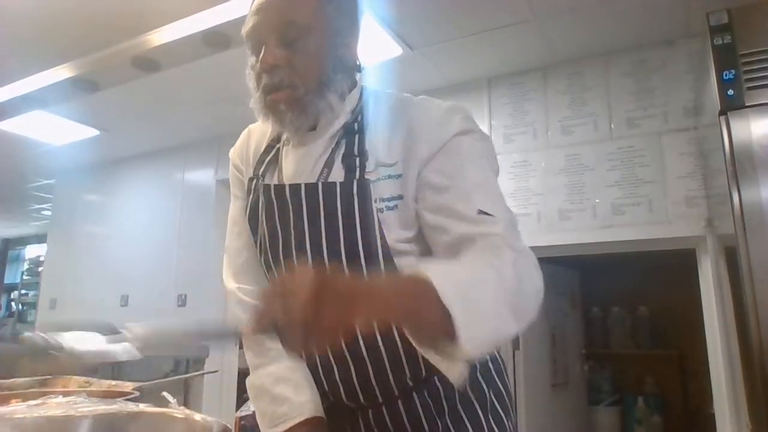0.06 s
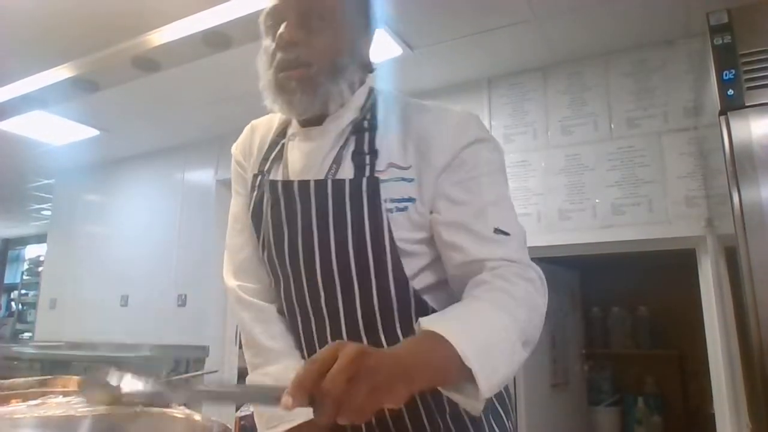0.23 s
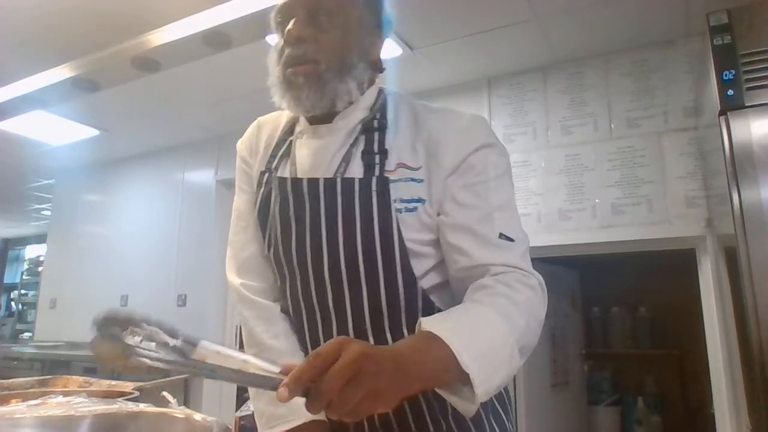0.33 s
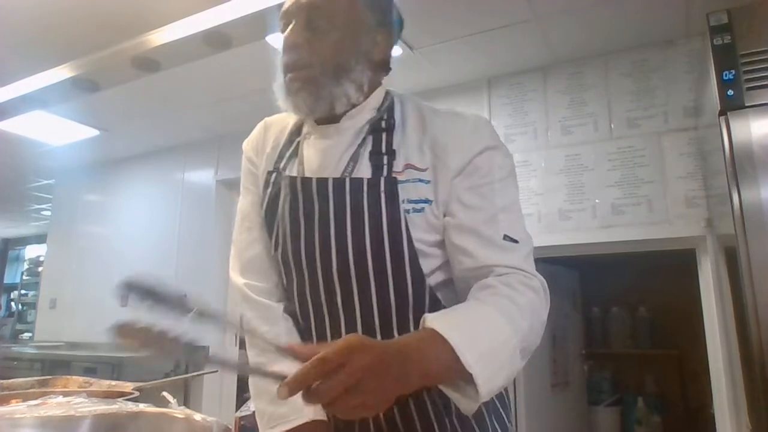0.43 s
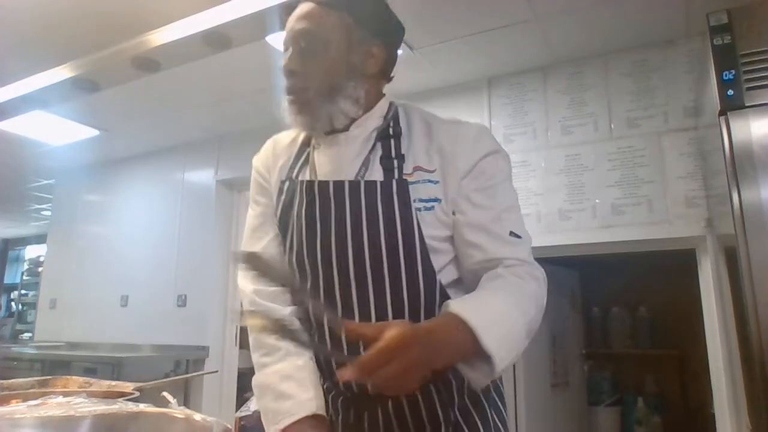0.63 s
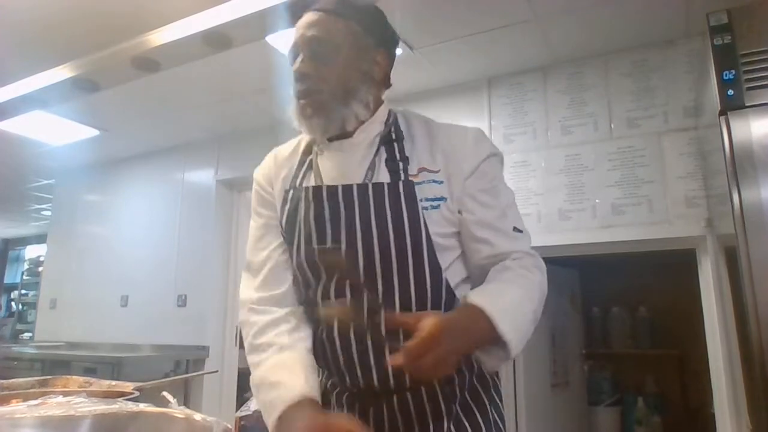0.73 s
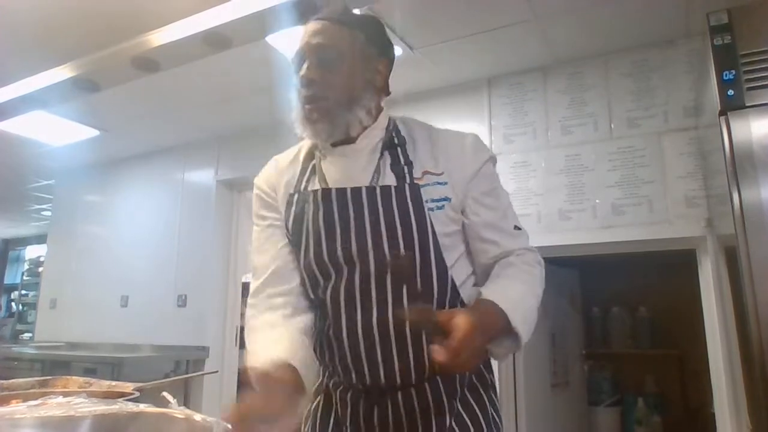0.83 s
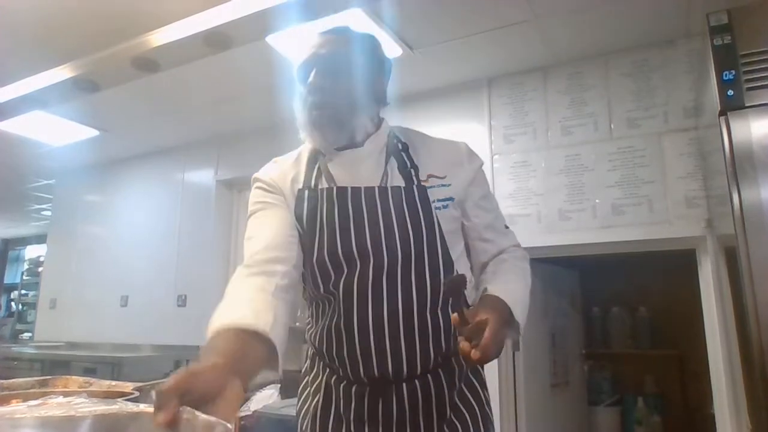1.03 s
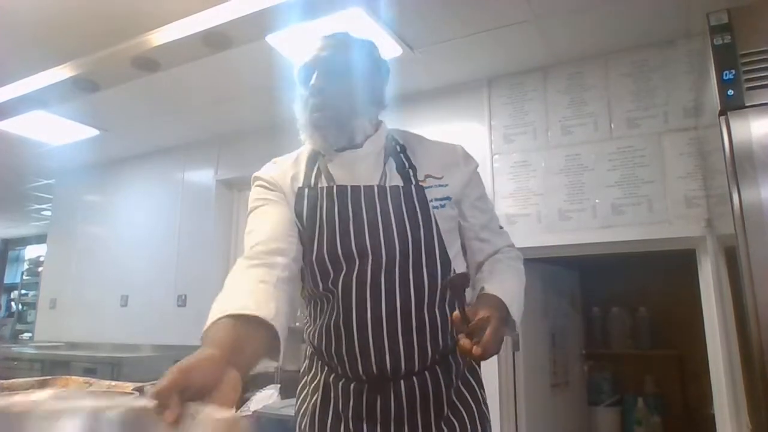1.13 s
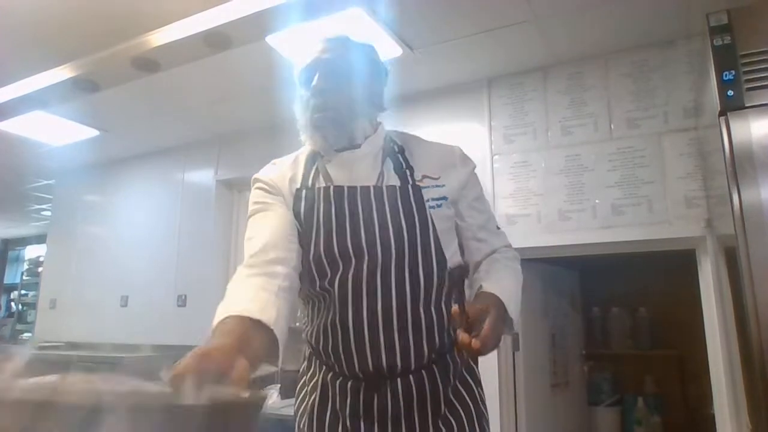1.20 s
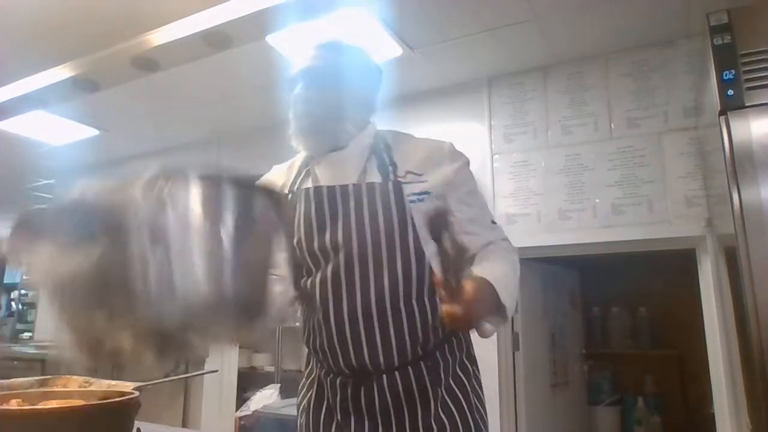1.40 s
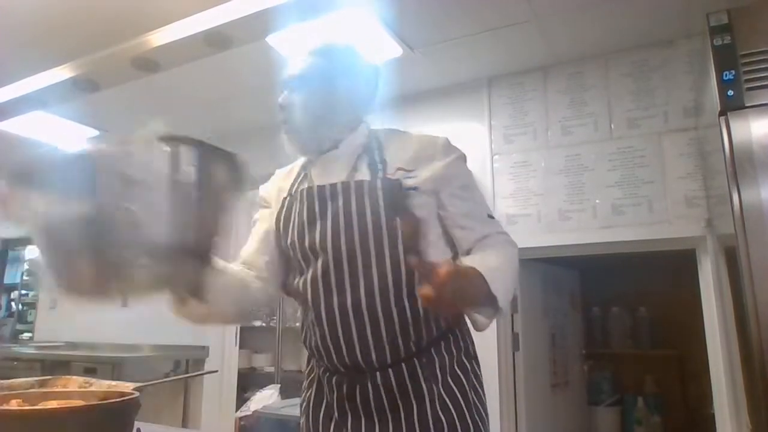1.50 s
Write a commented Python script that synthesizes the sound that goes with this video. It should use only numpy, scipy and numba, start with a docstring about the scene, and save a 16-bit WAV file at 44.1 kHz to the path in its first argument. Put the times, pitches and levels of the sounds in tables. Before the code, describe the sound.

Chicken sizzles and spits in hot oil throughout; a faint clink, then one loud ringing knock of steel tongs on the pan, then a few light clinks, over low extractor rumble in a tiled commercial kitchen, close microphone.

```python
"""In a kitchen, chicken sizzles in a pan of oil under the rumble of an extractor hood.
The oil is coloured noise, random crackle, ringing bubble pops and pitched spits of noise.
Steel tongs knock once on the pan's rim: fading sine waves ring over a noise thud.
A few light clinks, short bursts of coloured noise, come before and after the knock.
The hood is filtered noise; a limiter holds the knock down and lets go as it fades."""
import sys
import numpy as np
from scipy import signal
from scipy.fft import rfft, irfft
from scipy.io import wavfile
from numba import njit

SR = 44100
rng = np.random.default_rng(int(sys.argv[2]) if len(sys.argv) > 2 else 0)


def master(y):
    """Save y as 16-bit WAV."""
    cut = np.clip(np.atleast_2d(y).T, -1, 1)
    pcm = np.round(cut * 32767)  # scale
    wavfile.write(sys.argv[1], SR, pcm.astype(np.int16))


N = 68355  # length in samples, about 1.55 s
TOP_HZ = 15800  # upper edge of the sound


def undb(db):
    """Turn decibels into a gain."""
    return 10 ** (np.asarray(db) / 20)


def level(x, db):
    """Set the average (rms) strength of a sound in decibels."""
    return x * undb(db) / np.sqrt(np.mean(x ** 2))


def gain_at(hz, points):
    """Read a gain from a spectrum, joining its points along a log frequency scale."""
    f, db = np.array(points).T
    return undb(np.interp(np.log(np.maximum(hz, 1)), np.log(f), db))


def colour(x, points):
    """Shape a sound's spectrum, then set its rms to one."""
    hz = np.arange(N // 2 + 1) * SR / N
    shaped = irfft(rfft(x) * gain_at(hz, points), N)
    return level(shaped, 0)


def since(start):
    """Seconds since a moment, zero before it."""
    return np.maximum(np.arange(N) / SR - start, 0)


def fade(t, t60):
    """Die away exponentially from t = 0, falling 60 dB in t60 seconds."""
    return (t > 0) * np.exp(-np.log(1000) * t / t60)


def follow_level(points):
    """Gain over the whole scene from a table of times and levels."""
    return undb(np.interp(since(0), *np.array(points).T))


def bursts(rate, spread_db):
    """Single clicks at random moments: many small, a few large."""
    when, size, sign = rng.random((3, N))
    happens = when < rate / SR
    boost = np.minimum(-np.log(1 - size), 4)  # mostly small, never above 4
    return happens * np.sign(sign - .5) * undb(spread_db * boost)


ROOM_T60_S, ROOM_DB = 0.11, -2  # fading time; wash compared with the direct sound


def room(x):
    """Direct sound plus the short wash of tiled walls, made of fading noise."""
    tail = rng.standard_normal(N) * fade(since(0.009), ROOM_T60_S)
    tail = tail / np.linalg.norm(tail)
    return x + undb(ROOM_DB) * signal.fftconvolve(x, tail)[:N]


POP_PER_S, POP_SPREAD_DB = 150, 4
POP_HZ, POP_OCTAVES = 6980, 0.23  # middle pitch; one step of spread around it
POP_CYCLES = 2.5  # cycles for a ring to shrink to about a third


def pops(count=14):
    """Steam bubbles of many sizes burst in the oil, each ringing for a few cycles."""
    t = np.arange(SR // 50) / SR
    out = 0
    for step in np.linspace(-2, 2, count):
        hz = POP_HZ * 2 ** (step * POP_OCTAVES)
        ping = np.sin(2 * np.pi * hz * t) * np.exp(-hz * t / POP_CYCLES)
        moments = bursts(POP_PER_S / count, POP_SPREAD_DB)
        weight = np.exp(-step ** 2 / 6)  # middle pitches are strongest
        out = out + weight * signal.fftconvolve(moments, ping)[:N]
    return out


# colour of the frying oil: (frequency [Hz], relative level [dB per Hz])
OIL_COLOUR = [(1000, -4), (3300, -11.5), (4500, 0), (6000, -3), (7800, 0), (9500, -6.5), (12500, -10),
              (15500, -5.5)]
# swell and ebb of the sizzle: (time [s], level [dB])
SIZZLE_SWELL = [(0, 5.5), (.15, 1.5), (.42, 2), (.55, 2), (.7, 3), (.88, 0.5), (1.0, 1), (1.19, -0.5),
                (1.3, 1.5), (1.5, 2.5)]
HISS_DB, CRACKLE_DB, POP_DB = -46, -44.5, -48.5  # before the swell
CRACKLE_PER_S, CRACKLE_SPREAD_DB = 1500, 4


def sizzle():
    """Boiling oil: fine hiss, dense crackle and single pops swell and ebb together."""
    hiss = undb(HISS_DB) * colour(rng.standard_normal(N), OIL_COLOUR)
    crackle = colour(bursts(CRACKLE_PER_S, CRACKLE_SPREAD_DB), OIL_COLOUR)
    oil = hiss + level(room(crackle), CRACKLE_DB) + level(room(pops()), POP_DB)
    return oil * follow_level(SIZZLE_SWELL)


# loudest spits of oil: (time [s], pitch [Hz], level before fading [dB], time to fade by 60 dB [s])
OIL_SPITS = [(0.011, 5960, -27, 0.016), (0.0195, 4550, -33, 0.067), (0.382, 6070, -26, 0.021),
             (.392, 6400, -27.5, 0.02), (.427, 7300, -33.5, 0.036), (0.688, 6400, -31, 0.022),
             (.805, 6450, -37, 0.017), (.825, 7500, -30.5, 0.016), (.845, 15000, -38.5, 0.2),
             (0.869, 6430, -29.5, 0.018), (0.956, 5450, -36, 0.016), (1.066, 4260, -38, 0.096),
             (1.094, 9600, -36, 0.018), (1.392, 7140, -36.5, 0.035), (1.468, 6560, -30, 0.027)]
SPIT_WIDTH = 0.13  # width of the noise band as a share of the pitch


def spits():
    """Larger droplets flash to steam, each a brief pitched spatter of noise."""
    hz = np.arange(N // 2 + 1) * SR / N
    out = 0
    for start, pitch, db, t60 in OIL_SPITS:
        detune = (hz - pitch) / (SPIT_WIDTH * pitch / 2)
        band = 1 / (1 + detune ** 2) ** 0.64  # strongest at the pitch
        spatter = irfft(rfft(rng.standard_normal(N)) * band, N)
        out = out + level(spatter, db) * fade(since(start), t60)
    return out


# ringing notes of the knock, the pan's main modes plus, first, the hob's low ring under the thud: (frequency
# [Hz], relative level [dB], time to fade by 60 dB [s])
KNOCK_NOTES = [(135, -10, .42), (277.5, 1.5, .62), (289, 1.5, .48), (420, -8, .19), (541, -10, .18),
               (694, 1.5, .26), (735, 1.5, .3), (817, -6, .32), (852, -9, .3), (1045, -4, .22),
               (1087, 5.5, .23), (1233, 2, .26), (1313, 2, .25), (1491, -4, .39), (1684, -7, .26),
               (1787, -4, .22), (2191, -9, .24), (2412, -1, .25), (2509, -3, .27), (2672, 0, .2),
               (2977, -3, .18), (3149, -7, .24), (4285, -8, .18), (5039, -12, .18)]
KNOCK_S, RING_DB = .2401, -11  # moment of the knock; gain of all the notes
RING_BUILD_CYCLES = 3.1  # cycles for a note to build up to about two thirds


def knock_ring(t):
    """The pan's strong modes and the hob's low ring swing as sine waves that build up quickly, then fade."""
    ring = 0
    for hz, db, t60 in KNOCK_NOTES:
        build = 1 - np.exp(-hz * t / RING_BUILD_CYCLES)
        ring = ring + undb(db) * fade(t, t60) * build * np.sin(2 * np.pi * hz * t)
    return undb(RING_DB) * ring


# the pan's crowded minor notes: (frequency [Hz], relative level [dB per Hz])
SHIMMER_COLOUR = [(400, -9.5), (560, -11.5), (900, -18), (1100, -6.5), (2000, -14.5), (2600, -5.5),
                  (3150, -6.5), (3500, -13), (4300, -6), (5600, -10), (7400, -6.5), (9000, -33),
                  (15500, -31)]
SHIMMER_DB = -6
SHIMMER_T60_S, SHIMMER_DAMPING = 0.2, 0.6  # t60 at 3 kHz; it falls with this power of frequency
SHIMMER_BUILD_S, SHIMMER_FIRST = 0.0052, 0.48  # build-up time; share present at first contact


def pan_shimmer(t, count):
    """A crowd of minor modes, the higher ones dying sooner, blurs into a shimmer."""
    place, phase = rng.random((count, 2)).T
    lowest = SHIMMER_COLOUR[0][0]
    freqs = lowest + (np.arange(count) + place) / count * (TOP_HZ - lowest)
    gains = gain_at(freqs, SHIMMER_COLOUR)
    gains = gains / np.sqrt(np.sum(gains ** 2) / 2)  # the crowd starts near unit rms
    live = (t > 0) & (t < .5)
    u = t[live]
    shimmer = np.zeros(N)
    for hz, gain, p in zip(freqs, gains, phase):
        t60 = SHIMMER_T60_S * (3000 / hz) ** SHIMMER_DAMPING
        shimmer[live] += gain * fade(u, t60) * np.sin(2 * np.pi * (hz * u + p))
    build = 1 - (1 - SHIMMER_FIRST) * np.exp(-t / SHIMMER_BUILD_S)
    return undb(SHIMMER_DB) * shimmer * build


# dull thud of the pan on the hob: (frequency [Hz], relative level [dB per Hz])
THUD_COLOUR = [(25, -13), (60, -30), (130, 3.5), (290, -11), (480, 7.5), (700, -9), (2000, -17.5),
               (8000, -30), (15500, -40)]
THUD_DB, THUD_T60_S = -5.5, 0.1  # level before fading; time to fade by 60 dB


def knock(count=420):
    """Tongs strike the pan: strong low modes, a crowd of minor ones and a thud."""
    t = since(KNOCK_S)
    thud = colour(rng.standard_normal(N), THUD_COLOUR) * fade(t, THUD_T60_S)
    return knock_ring(t) + pan_shimmer(t, count) + undb(THUD_DB) * thud


# light clinks of the tongs: (time [s], level before filter and fading [dB])
CLINK_TIMES = [(0.1898, -26), (.678, -26.5), (.906, -32.5), (1.237, -34), (1.324, -36)]
# colour of a clink: (frequency [Hz], relative level [dB per Hz])
CLINK_SPECTRUM = [(500, 8), (1500, -2), (2050, -2.5), (2350, 3), (2900, -2), (3500, -6.5), (4400, -4),
                  (6500, -3.5), (9000, -12), (15000, -13)]
CLINK_T60_S = .085


def clinks():
    """Light, short touches of steel on steel: coloured noise that fades fast."""
    strength = sum(undb(db) * fade(since(start), CLINK_T60_S) for start, db in CLINK_TIMES)
    touches = colour(rng.standard_normal(N), CLINK_SPECTRUM) * strength
    low_cut = signal.butter(2, 150, "high", fs=SR, output="sos")
    return signal.sosfilt(low_cut, touches)


# colour of the extractor's air: (frequency [Hz], relative level [dB per Hz])
HOOD_COLOUR = [(24, -85), (45, -63), (70, -25), (100, -8.5), (130, -0.5), (220, -4.5), (370, -6.5),
               (480, -15.5), (650, -17), (1100, -19.5), (1320, -16.5), (1650, -25), (2400, -26.5),
               (3400, -31.5), (8000, -54), (16000, -41)]
# swell of the hood's low rumble: (time [s], level [dB])
RUMBLE_SWELL = [(0, 3), (.11, 6.5), (.2, -4), (.4, -7), (.5, 4), (0.599, -23), (.68, 7.5), (.8, -9.5),
                (.9, 2.5), (1.02, 8.5), (1.1, -3), (1.3, 1.5), (1.55, -8)]
HOOD_DB, RUMBLE_EDGE_HZ = -31.5, 158  # level before the rumble swells; top of the rumble


def hood():
    """Turbulent air in the extractor; its low rumble swells and sinks."""
    air = colour(rng.standard_normal(N), HOOD_COLOUR)
    low_pass = signal.butter(2, RUMBLE_EDGE_HZ, fs=SR, output="sos")
    rumble = signal.sosfiltfilt(low_pass, air)
    rest = air - rumble
    return undb(HOOD_DB) * (rest + rumble * follow_level(RUMBLE_SWELL))


def scene():
    """The whole kitchen at one microphone."""
    return (sizzle() + spits() + knock() + clinks() + hood())[None]


@njit
def follow(x, attack, release):
    """Track the peaks of a sound, with separate rates for rising and falling."""
    out, e = np.empty(len(x)), 0.
    for i in range(len(x)):
        e += (x[i] - e) * (attack if x[i] > e else release)
        out[i] = e
    return out


LIMIT_DB, LIMIT_ATTACK_S, LIMIT_RELEASE_S = -5, 0.00017, 0.009
CEILING = 0.5  # peaks are rounded off towards this height, before the top cut


def record(dry):
    """The recorder: a fast limiter, rounded peaks and a steep top cut."""
    attack = 1 - np.exp(-1 / (LIMIT_ATTACK_S * SR))
    release = 1 - np.exp(-1 / (LIMIT_RELEASE_S * SR))
    peak = follow(np.abs(dry[0]), attack, release)
    held = dry / np.maximum(peak / undb(LIMIT_DB), 1)
    rounded = held / (1 + (held / CEILING) ** 6) ** (1 / 6)
    top_cut = signal.ellip(12, .2, 70, TOP_HZ, fs=SR, output="sos")
    return signal.sosfilt(top_cut, rounded)


dry = scene()
out = record(dry)
master(out)
```